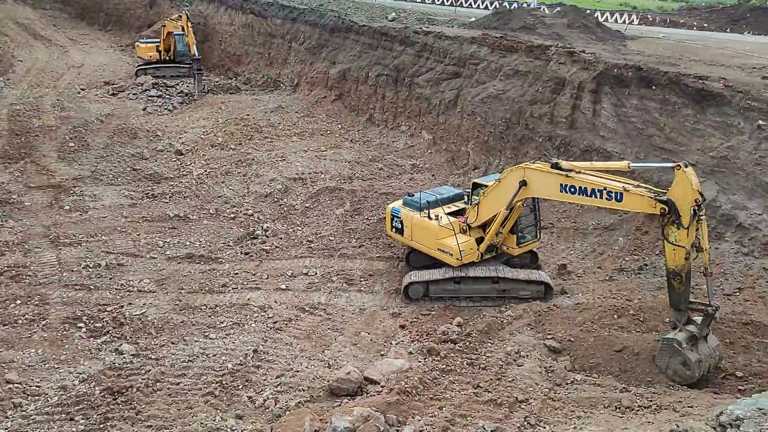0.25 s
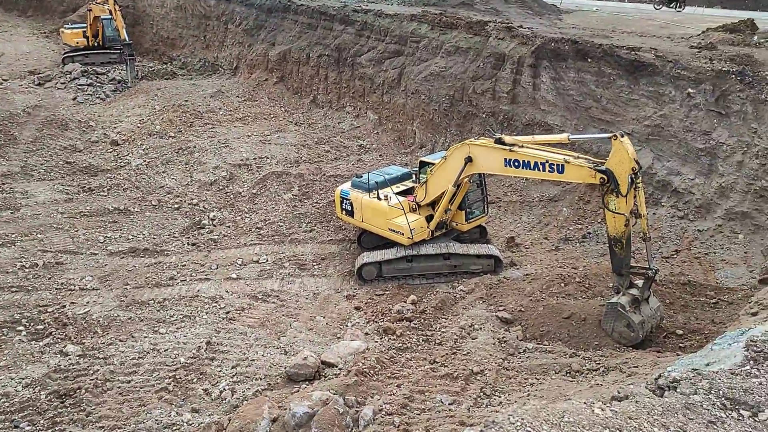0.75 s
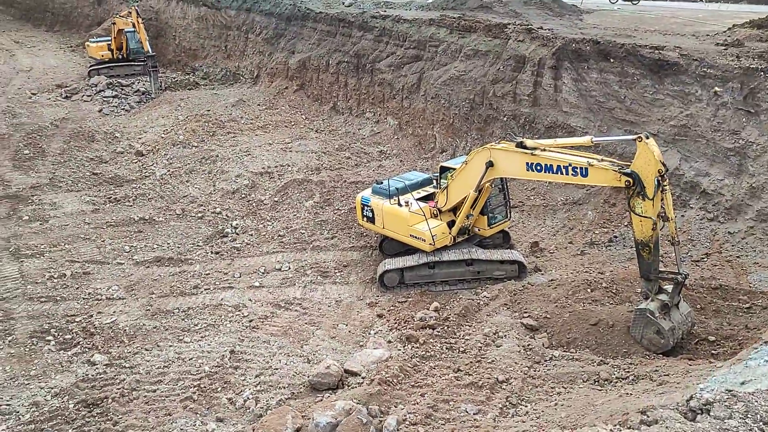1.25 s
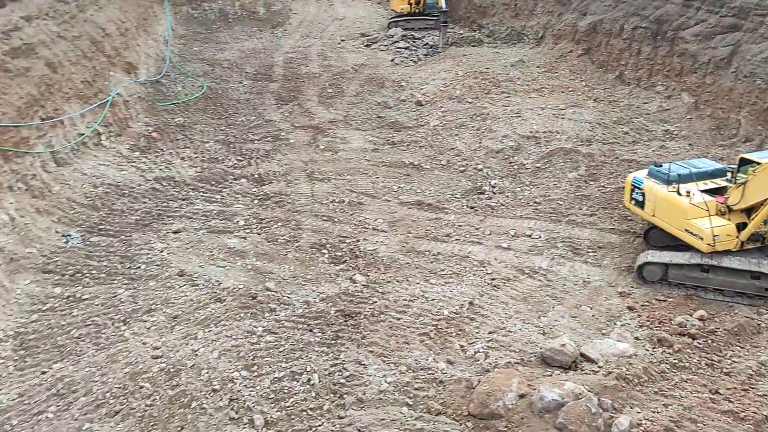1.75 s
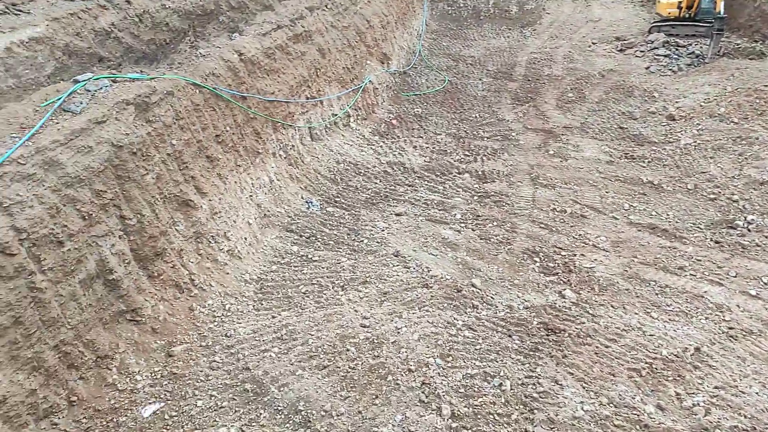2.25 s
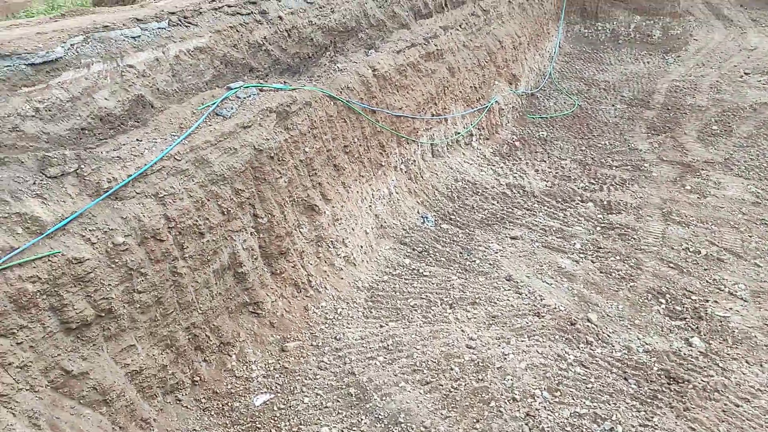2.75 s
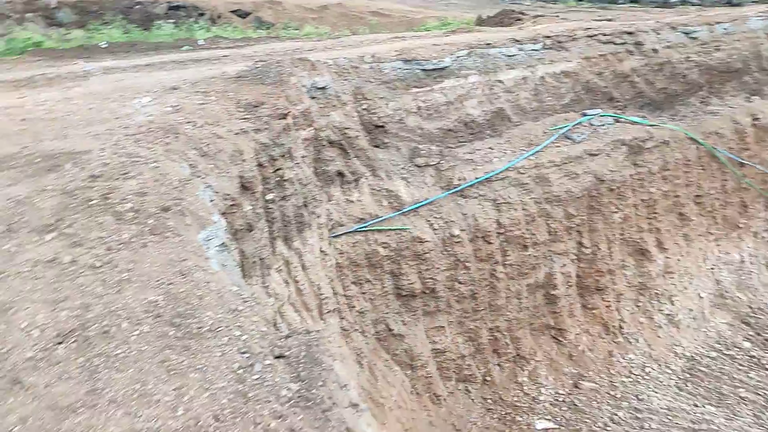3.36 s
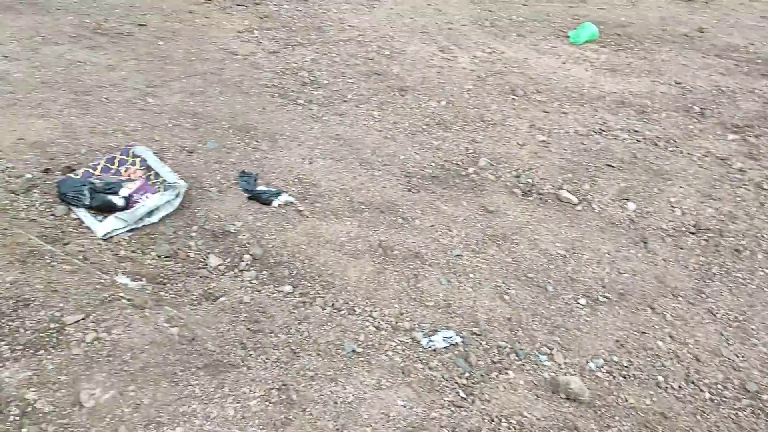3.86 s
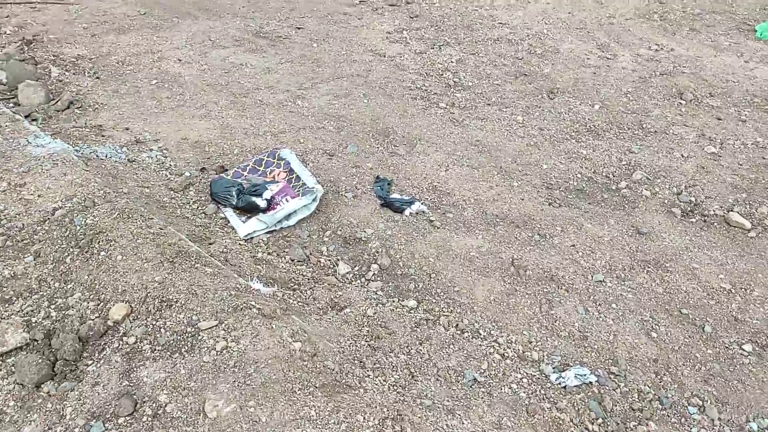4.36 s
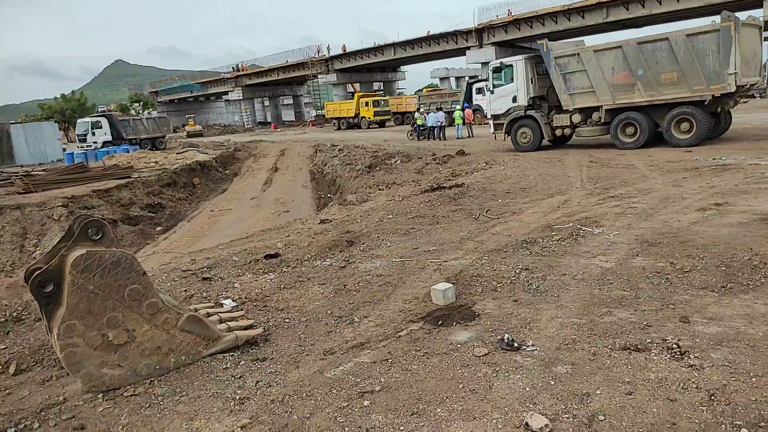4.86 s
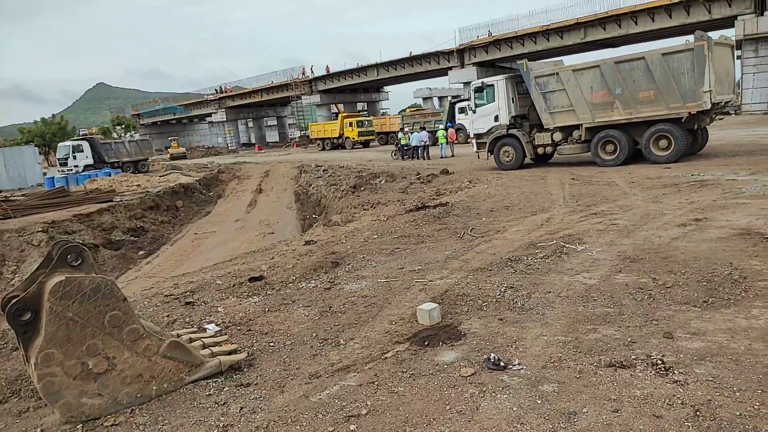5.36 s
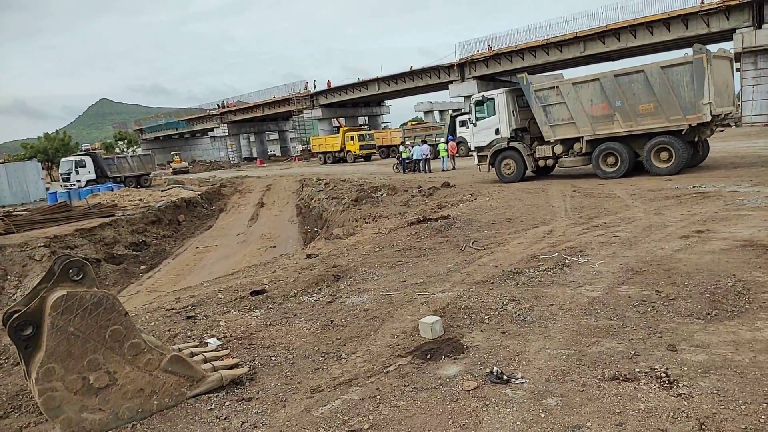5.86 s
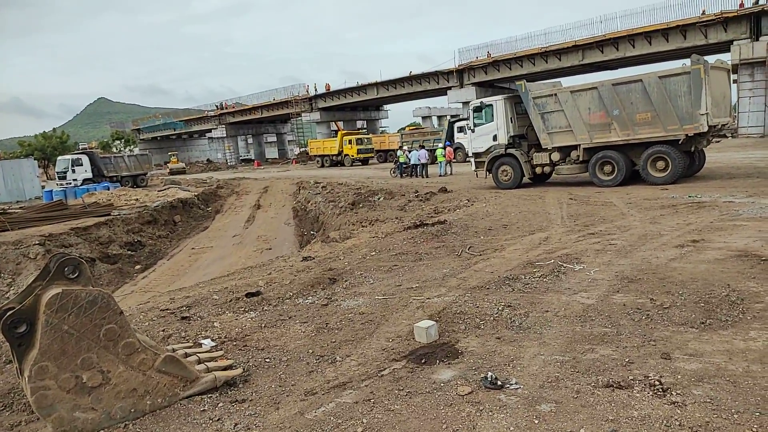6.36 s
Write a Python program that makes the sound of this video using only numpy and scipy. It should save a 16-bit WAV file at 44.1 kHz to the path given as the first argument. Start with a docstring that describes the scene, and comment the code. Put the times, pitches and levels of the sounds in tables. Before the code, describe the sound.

In an open earth pit a hydraulic breaker pounds rock in rapid even blows, about five a second, each a hollow boom, steel clang, dull thud and gritty crack with an echo off the pit wall. Diesel engines run steadily behind. As the handheld stereo microphone turns away, wind bursts thump and crackle on it; a faint squeal of metal passes. Then the hammering is quieter from beside the haul road, still with gusts.

```python
"""A hydraulic breaker pounds rock about five times a second in an earth pit: each blow rings housing and
chisel, thuds in the rock and cracks off splinters, built from dying tones and shaped noise, with hiss.
Diesel engines run steadily around the site, as wavering tones, clatter and throbbing noise.
The listener turns away, then stands by the haul road; noise gusts buffet the two microphone ports.
A faint metal squeal, two rushes of hiss and a few dry ticks are heard besides."""
import sys
import numpy as np
from scipy import signal
from scipy.fft import rfft, irfft, next_fast_len
from scipy.io import wavfile
from scipy.ndimage import uniform_filter1d

SR = 44100
rng = np.random.default_rng(int(sys.argv[2]) if len(sys.argv) > 2 else 0)


def waveform_to_disk(signal):
    """Save audio, clipped to [-1, 1], as 16-bit WAV at the path in sys.argv[1]."""
    frames = np.transpose(np.atleast_2d(signal))
    scaled = np.clip(frames, -1, 1) * 32767
    samples = np.round(scaled).astype(np.int16)
    wavfile.write(sys.argv[1], SR, samples)


N = 291496
TIME = np.arange(N) / SR
FULL_LEFT_LAG_S = 0.00046   # how much later the left port hears a blow when the breaker is at full left


def from_db(db):
    """Turn decibels into a plain gain."""
    return 10 ** (np.asarray(db) / 20)


def rms_one(x):
    """Scale a sound to an average (rms) strength of 1."""
    return x / np.sqrt(np.mean(x ** 2) + 1e-20)


def read(rows, at):
    """Every column of a curve at the given times."""
    s, *columns = np.transpose(rows)
    return [np.interp(at, s, column) for column in columns]


def pan(db):
    """Left and right gains for a level difference; positive is louder on the left."""
    sides_db = np.array([np.atleast_1d(db), -np.atleast_1d(db)]) / 2
    return rms_one(np.ones(2))[:, None] * from_db(sides_db)


def nearer_port(db):
    """Left and right gains that leave the louder port at full level."""
    return pan(db) / pan(db).max()


def add(out, s, sound):
    """Mix a stereo sound in at a time."""
    at = max(round(s * SR), 0)
    part = sound[:, :max(N - at, 0)]
    out[:, at:at + part.shape[1]] += part


def colour(x, spectrum):
    """Filter by a curve of (frequency [Hz], level [dB])."""
    length = x.shape[-1]
    size = next_fast_len(length)
    hz, db = np.transpose(spectrum)
    bins = np.maximum(np.fft.rfftfreq(size, 1 / SR), 1)
    gain = from_db(np.interp(np.log(bins), np.log(hz), db))
    return irfft(rfft(x, size) * gain, size)[..., :length]


def noise(spectrum, shape):
    """Random hiss with a given colour, rms 1."""
    return rms_one(colour(rng.standard_normal(shape), spectrum))


def butter(x, hz, kind, order):
    """Keep the sound below, above or between the given frequencies."""
    sos = signal.butter(order, np.clip(hz, 10, 0.45 * SR), kind, fs=SR, output="sos")
    return signal.sosfilt(sos, x)


def band_noise(low_hz, high_hz):
    """Separate noise for the two ports between two frequencies."""
    return butter(rng.standard_normal((2, N)), [low_hz, high_hz], "band", order=2)


def drift(rate):
    """Slow chance wandering of spread 1, quicker for a higher rate; worked out every 40 samples."""
    r = np.exp(-80 * np.pi * rate / SR)
    slow = signal.lfilter([1], [1, -2 * r, r * r], rng.standard_normal(N // 40 + 2002))[2000:]
    return np.interp(np.arange(N) / 40, np.arange(len(slow)), rms_one(slow))


def decay(t, t60):
    """Silent before zero, then dying away by 60 dB in t60 seconds."""
    return (t >= 0) * np.exp(-np.log(1000) * np.maximum(t, 0) / t60)


def engines(site_db=-28.0, throb=0.023, wander=0.00402, clatter_db=-49, clatter_spread_db=4):
    """A near diesel's wavering firing tones and clatter over the throbbing wash of other machines."""
    firing_hz = 52.7   # average firing rate
    # tones of the engine and its pumps: (multiple of the firing rate [ratio], level [dB])
    orders = [(1, -38), (1.999, -43.5), (3, -40), (3.9, -43.5), (5, -48)]
    # colour of the machines across the site: (frequency [Hz], level [dB per Hz])
    site = [(20, 5), (60, 1.5), (115, -7.5), (175, -1.5), (300, -2), (430, -10.5), (560, -11.5),
            (850, -13.5), (1500, -21), (2600, -24.5), (4000, -30.5), (6000, -34.5), (9000, -31),
            (14000, -97)]
    # level of the engines as the listener turns: (time [s], level [dB], left-right [dB])
    engine_level = [(0, 1, 1), (1.6, 0, 0.5), (3.3, 0, -2), (3.8, -1.5, 0), (4.6, 0, 0.5), (5.7, -0.5, -1),
                    (6.6, -3, -3)]

    turns = np.cumsum(firing_hz * (1 + wander * drift(2.03))) / SR   # firings so far
    hum = 0
    for multiple, db in orders:
        level = from_db(db + 4 * drift(9)) * np.sqrt(2)
        phase = multiple * (turns + 0.05 * drift(9)) + rng.random()
        hum = hum + level * np.sin(2 * np.pi * phase)
    wash = noise(site, (2, N)) * (1 + throb * np.sin(2 * np.pi * turns)) * from_db(1.0 * drift(18))
    # the strength of the knocks wanders from firing to firing
    firings = decay(turns % 1 / firing_hz, 0.071) * from_db(clatter_spread_db * drift(30))
    clatter = rms_one(firings * band_noise(1000, 3200))
    level_db, side_db = read(engine_level, TIME)
    return pan(side_db) * from_db(level_db) * (hum + from_db(site_db) * wash) + from_db(clatter_db) * clatter


def squeal(squeal_db=-1.0):
    """Steel rubs on steel for a moment somewhere on the site: a few unsteady tones."""
    # faint rise and fall of the squeal: (time [s], level [dB])
    squeal_level = [(3.64, -70), (3.73, -48), (3.8, -46), (3.98, -47), (4.12, -52), (4.28, -72)]
    # its middle pitch: (time [s], frequency [Hz])
    squeal_pitch = [(3.78, 2910), (3.88, 3200), (3.98, 3300), (4.2, 3200)]
    # its tones: (multiple of that pitch [ratio], level [dB])
    squeal_tones = [(1, 0), (.95, -4), (1.025, -4)]

    (level_db,), (hz,) = read(squeal_level, TIME), read(squeal_pitch, TIME)
    tones = 0
    for ratio, db in squeal_tones:
        cycles = np.cumsum(ratio * hz * (1 + 0.022 * drift(140))) / SR
        tones = tones + from_db(db + 4 * drift(19)) * np.sin(2 * np.pi * cycles)
    rubbing = (TIME > squeal_level[0][0]) & (TIME < squeal_level[-1][0])
    return pan(3) * rubbing * from_db(level_db + squeal_db) * rms_one(tones)


def rushes():
    """Soft rushes of hiss: bands of noise that swell to a peak and die away."""
    # (time of peak [s], rise [s], t60 [s], level [dB], pitch that places the band [Hz])
    rush_list = [(2.3, 0.046, 0.5, -29.5, 5400), (3.779, 0.014, 1.8, -39, 3840)]
    out = np.zeros((2, N))
    for s, rise, t60, db, hz in rush_list:
        shape = decay(TIME - s, t60) + (TIME < s) * np.exp(-abs(TIME - s) / rise)
        out += from_db(db) * shape * rms_one(band_noise(hz / 3.3, hz * 1.8))
    return out


def ticks():
    """A few small, sharp, dry ticks: very short bursts of high noise."""
    # (time [s], strength before the common cut [dB], left-right [dB])
    tick_list = [(0.134, -17, 8), (5.774, -24, 2), (6.229, -7, 8), (6.236, -6, -2), (6.266, -12, 26)]
    out, t = np.zeros((2, N)), TIME[:SR // 20]
    for s, db, side_db in tick_list:
        burst = decay(t, 0.0086) * butter(rng.standard_normal(len(t)), 5900, "high", order=2)
        add(out, s, pan(side_db) * from_db(db - 18.5) * burst)
    return out


def buffet(eddies, top_hz):
    """Eddies on a port, heard up to about the pitch of the smallest; rms 1."""
    band = butter(butter(eddies, top_hz * 1.225, "low", order=4), top_hz * 0.22, "low", order=1)
    return rms_one(butter(band, 166.4, "high", order=3))


def wind_eddies(lumps_db=3.5, surge_db=1.5, knocks_per_s=70, knock_size=10):
    """Lumpy noise with scattered knocks, one set for the breeze and one for the gusts, two ports each."""
    shape = (2, 2, N)
    knocks = knock_size * (rng.random(shape) < knocks_per_s / SR) * rng.choice([-1, 1], shape)
    lumps = from_db(np.array([lumps_db * drift(138) + surge_db * drift(35) for port in range(2)]))
    return knocks + rng.standard_normal(shape) * lumps


def breeze(eddies, rumble, rumble_db=0.0, flutter_hz=320, flutter_db=-3, flutter_pan_db=3):
    """The breeze rumbles and flutters at each port."""
    # strength and side of the breeze: (time [s], level [dB], left-right [dB])
    breeze_level = [(0, -44, 7), (1.8, -34, 2), (1.92, -18, -4), (2.2, -24, 1), (2.39, -32, -2),
                    (2.6, -28, 7), (3.05, -30.5, -4), (3.5, -22.5, -4), (3.8, -27, 17), (4.1, -24.5, -1),
                    (4.4, -37, -5), (4.72, -40, 13), (4.9, -30.5, 10.5), (5.45, -28, 9), (5.65, -26, 7),
                    (5.9, -27.5, 3.5), (6.2, -24, 6.5), (6.6, -26.5, -2.5)]
    level_db, side_db = read(breeze_level, TIME)
    flutter = pan(flutter_pan_db) * from_db(flutter_db) * buffet(eddies, flutter_hz)
    return pan(side_db) * from_db(level_db) * (from_db(rumble_db) * rumble + flutter)


def gusts(eddies, rumble, fade_db=3, rise_s=0.0048, fall_s=0.032, slap_db=-4.0, slap_t60=0.02,
          weight_db=-12):
    """Short lumpy gusts start softened, fade along their length and deepen the rumble."""
    # (start [s], length [s], pitch of the smallest eddy [Hz], level [dB], left-right [dB])
    gust_list = [(1.623, 0.15, 314, -26, -11), (1.858, 0.079, 550, -13, -25), (1.97, 0.07, 760, -16, 3.5),
                 (2.089, 0.057, 890, -15.5, 3), (2.17, 0.078, 685, -13.5, 9), (2.241, 0.11, 880, -19.5, 22),
                 (2.488, 0.041, 486, -16.5, 7), (2.559, 0.072, 990, -16.5, 39),
                 (2.725, 0.094, 274, -22.5, 12), (2.892, 0.099, 1080, -13, 29), (3.386, 0.19, 236, -17, 3),
                 (3.434, 0.058, 655, -12.5, 12), (3.536, 0.14, 418, -19.5, 19), (3.625, 0.13, 556, -20, 22),
                 (4.174, 0.02, 550, -12, -20), (4.823, 0.19, 355, -17, 24), (5.091, 0.3, 307, -18, 14),
                 (5.406, 0.071, 527, -12, 17), (5.455, 0.097, 570, -19.5, 26), (6.254, 0.23, 580, -14, 23),
                 (6.494, 0.29, 870, -16.5, 17)]
    out = np.zeros((2, N))
    for start, length, top_hz, db, side_db in gust_list:
        span = slice(max(int((start - rise_s) * SR), 0), int((start + length + fall_s) * SR))
        t = TIME[span] - start
        edges = np.clip(np.minimum(t / rise_s, (length - t) / fall_s) + 0.5, 0, 1)
        shape = edges * from_db(fade_db * (1 - t / length) + slap_db * decay(t, slap_t60))
        flutter = np.array([buffet(port, top_hz) for port in eddies[:, span]])
        gust = flutter + from_db(weight_db) * rumble[:, span]
        out[:, span] += nearer_port(side_db) * from_db(db) * shape * gust   # windward port is loudest
    return out


def wind():
    """Breeze and gusts share one low rumble, made separately for each port."""
    low = butter(rng.standard_normal((2, N)), 130, "low", order=2)
    rumble = rms_one(butter(low, 23.0, "high", order=2))
    eddies = wind_eddies()
    return breeze(eddies[0], rumble) + gusts(eddies[1], rumble)


def thumps(thump_db=1, wake_db=-23, wake_t60=0.07):
    """One eddy hits a port: a sharp pressure pulse with a short churning wake."""
    # (time [s], pitch of the smallest eddy [Hz], peak before thump_db [dB], left-right [dB])
    thump_list = [(1.634, 330, -16, -18), (1.821, 553, -10, -18), (1.922, 890, -7.5, -17),
                  (1.968, 920, -2, 19), (2.049, 420, -8, -11), (2.166, 880, -3, 11), (2.198, 450, -22, 12),
                  (2.238, 1100, -2, 19), (2.577, 1310, -1, 22), (2.603, 1480, -4.5, 18),
                  (2.901, 1310, -20, 17), (2.961, 1120, -10, 24), (3.413, 604, -5.5, 13),
                  (3.488, 280, -5, -8), (3.508, 895, -11, 2), (3.529, 250, -6, -16), (4.863, 380, -8, 20),
                  (4.905, 634, -11, 14), (4.966, 360, -5, 3), (5.084, 1100, -13.5, 16),
                  (5.274, 310, -5.5, -6), (5.351, 710, -5.5, 23), (5.463, 785, -7, 25),
                  (5.726, 415, -9.5, 17), (6.265, 775, -9, 24), (6.310, 696, -7, 25),
                  (6.457, 895, -6.5, 12), (6.5, 850, -12, 16)]
    out, t = np.zeros((2, N)), TIME[:SR // 16]
    for s, top_hz, db, side_db in thump_list:
        wake = from_db(wake_db) * rng.standard_normal((2, len(t))) * decay(t, wake_t60)
        pulse = buffet((t == 0) + wake, top_hz)
        pulse = pulse / abs(pulse).max(axis=1)[:, None]
        add(out, s, nearer_port(side_db) * from_db(db + thump_db) * pulse)
    return out


def crackle(x, crackle_db=-19, low_hz=800, high_hz=1900):
    """The strongest swings of the wind tear at the port's edge and crackle."""
    return from_db(crackle_db) * x * abs(x) * rms_one(band_noise(low_hz, high_hz))


def leftward(at):
    """How far to the left the breaker lies, from -1 to 1."""
    # direction of the breaker as the listener turns: (time [s], angle to the left [degrees])
    bearing = [(.1, 40), (.9, 53), (1.5, 48), (2.06, -14), (2.85, -36), (3.65, -78), (4.7, -70), (4.74, 57)]
    return np.sin(np.radians(read(bearing, at)[0]))


def blows(spread_db=0.77):
    """Each blow's time, strength with chance spread, direction (1 = full left) and listener's stance."""
    # runs of evenly spaced blows: (first blow [s], last blow [s], blows [count])
    runs = [(.113, 2.642, 14), (2.843, 4.647, 10), (4.784, 6.55, 10)]
    # strength of the blows at the listener: (time [s], level [dB])
    strength = [(.1, -1), (.7, -1.5), (1.5, -2), (2.06, -2), (2.6, 2.5), (3.3, 1), (3.95, -4), (4.65, -6),
                (4.8, -10), (5.3, -7.5), (5.8, -9), (6.55, -9)]
    # the listener faces the pit, turns aside, turns right away, then stands by the haul road:
    # (from [s], boom [dB], plate [dB], rock [dB], chisel [dB], crack [dB], pit-wall echo [dB],
    #  bass left-right [dB], boom pitch [ratio], left port's lag for the boom [s], clank [Hz],
    #  clank [dB], crack common to both ports [0-1], echo delay [s], t60 of thud and crack [s],
    #  thud left-right [dB], treble of the crack [dB])
    stances = [(0, -15.5, -37, -20.5, -19.5, -32.5, -2.5, 7, 1.02, 0.00049, 1136, -17.5, 0.08, 0.024, 0.3, 4, -0.5),
               (1.95, -25.5, -26, -22.5, -27, -35.5, 0, -0.5, 1.05, -.0003, 1260, -29.5, 0.4, 0.024, 0.3, 1.5, -4),
               (3.4, -30, -20.5, -21, -23.5, -36, -1, 1, .99, -.0004, 1450, -24.5, 0.44, 0.023, 0.26, 3, -1),
               (4.72, -10.5, -24, -20.5, -20, -30.5, 3, 7.5, .99, .0004, 2410, -25.5, 1, 0.028, 0.33, -9, 1)]
    names = ("boom_db plate_db rock_db chisel_db crack_db echo_db bass_pan_db pitch boom_lag_s clank_hz "
             "clank_db alike echo_s t60 rock_pan_db treble_db").split()

    for first, last, count in runs:
        for s in np.linspace(first, last, int(count)):
            stance = [row[1:] for row in stances if row[0] <= s][-1]
            blow_db = read(strength, s)[0] + spread_db * rng.normal()
            yield s, blow_db, leftward(s), dict(zip(names, stance))


def pit(t, stance, t60, tail_db, tail_t60):
    """Envelope of a blow in the pit: direct sound, the far wall's echo and a scattered tail."""
    echo = from_db(stance["echo_db"])
    direct_power = decay(t, t60) ** 2
    echo_power = (echo * decay(t - stance["echo_s"], t60)) ** 2
    tail_power = (from_db(tail_db) * decay(t, tail_t60)) ** 2
    return np.sqrt((direct_power + echo_power + tail_power) / (1 + echo ** 2))


def scatter(x, paths, s, gain=1.0):
    """Echoes off nearby ground and steel; their delays shift slowly as the listener moves."""
    out = x.copy()
    for k, (delay_s, slide) in enumerate(paths):
        lag = max(int(delay_s * (1 + slide * s) * SR), 1)
        out[:, lag:] += (-1) ** k * gain * x[:, :-lag]
    return out / np.sqrt(1 + len(paths) * gain ** 2)


def at_ports(spectrum, lag_s, size, alike):
    """Noise that both ports partly share; a positive lag makes the left one hear it later."""
    three, at = noise(spectrum, (3, size)), np.arange(size)
    alike = np.clip(alike, 0, 1)
    shared = np.array([np.interp(at - np.round(lag_s * SR), at, three[0]), three[0]])
    return np.sqrt(alike) * shared + np.sqrt(1 - alike) * three[1:]


def blow_hiss(swell_s=0.018, swell_db=-6, hiss_db=1.0):
    """A hiss swells ahead of each blow and dies after it."""
    # colour of the hiss: (frequency [Hz], level [dB per Hz])
    hiss_colour = [(2500, -13), (4500, -0.5), (6000, -1), (8000, 3.5), (14000, -5.5)]
    # level of the hiss that goes with the blows, before hiss_db: (time [s], level [dB])
    hiss_level = [(.1, -30), (.5, -29.5), (.7, -26.5), (1.1, -30), (1.5, -32.5), (2.06, -38), (2.3, -31),
                  (2.65, -29), (3.25, -33), (3.45, -39.5), (3.85, -46), (4.45, -46), (4.65, -40),
                  (4.79, -31.5), (4.98, -31), (5.18, -28), (5.57, -28.5), (5.77, -31), (5.96, -29.5),
                  (6.36, -30.5), (6.55, -28.5)]

    power, around = np.zeros((2, N)), TIME[:SR // 2] - 0.1   # starts 0.1 s before the blow
    for s, _, left, stance in blows():
        swell = from_db(swell_db) * (around < 0) * np.exp(-abs(around) / swell_s)
        shape = pit(around, stance, t60=0.21, tail_db=-14.0, tail_t60=0.36) + swell
        side_db = 1 - 6.5 * left   # left-right balance follows the breaker's direction
        level = from_db(read(hiss_level, s)[0] + hiss_db)
        add(power, s + around[0], (pan(side_db) * level * shape) ** 2)
    hiss = at_ports(hiss_colour, FULL_LEFT_LAG_S * leftward(TIME), N, alike=0.076)
    return np.sqrt(power) * hiss * from_db(1.3 * drift(64))


def ring(modes, t, attack_s=0.0038):
    """Struck modes of alternating sign: a close pair swells before it fades."""
    tones = 0
    for k, (hz, db, t60) in enumerate(modes):
        tones = tones + (-1) ** k * from_db(db) * np.sin(2 * np.pi * hz * t) * decay(t, t60)
    return (1 - np.exp(-np.maximum(t, 0) / attack_s)) * tones


def housing_boom(t, stance, boom_db=9.0, swell_s=0.0074):
    """The breaker's housing and its side plate boom, with slight chance shifts of pitch and level."""
    # modes of the housing, the main two close together: (frequency [Hz], level [dB], t60 [s])
    housing = [(160.7, -12, 0.18), (243, -14.5, 0.14), (279.4, -12, 0.16), (346, 0.5, 0.14),
               (355.9, -2, 0.14), (428.5, -14.5, 0.14)]
    # modes of the side plate, heard best from one side: (frequency [Hz], level [dB], t60 [s])
    plate = [(415.7, 5, 0.24), (263, 0, 0.15)]
    t_boom = t - np.array([[stance["boom_lag_s"]], [0]])
    pitch = stance["pitch"] * (1 + 0.008 * rng.normal())
    struck = [(hz * pitch * (1 + 0.003 * rng.normal()), db + 1.2 * rng.normal(), t60)
              for hz, db, t60 in housing]
    boom = from_db(stance["boom_db"] + boom_db) * ring(struck, t_boom, swell_s)
    return pan(stance["bass_pan_db"]) * (boom + from_db(stance["plate_db"]) * ring(plate, t_boom, swell_s))


def chisel_clang(t_ports, stance, detune=0.0031, strike_spread_db=1.8):
    """The steel chisel rings in many modes, each with its own side and a fresh strength every blow."""
    # modes of the chisel: (frequency [Hz], level [dB], t60 [s], left-right [dB])
    chisel = [(677.5, -12.5, 0.28, -12), (808, -6.5, 0.33, -4), (862, -16, 0.24, 5), (959, -6.5, 0.31, -1),
              (1096, -5.5, 0.43, 2.5), (1234, -9, 0.11, -8), (1352, -8, 0.045, 14), (1537, -13, .16, 4),
              (1660, -12, 0.14, 1), (1924, -10, 0.17, 0), (2310, -22, 0.13, 10), (2510, -16.5, 0.15, -3),
              (2700, -18.5, 0.19, 11)]
    clang = 0
    for k, (hz, db, t60, side_db) in enumerate(chisel):
        mode = (hz * (1 + detune * rng.normal()), db + strike_spread_db * rng.normal(), t60)
        clang = clang + (-1) ** k * pan(side_db) * ring([mode], t_ports)
    return from_db(stance["chisel_db"]) * clang


def steel_clank(t, t_ports, stance, steel, dying, clank_t60=0.01, tail_db=-4):
    """The same noise for every blow, filtered to a hump at the stance's clank pitch, dies quickly."""
    hz = stance["clank_hz"]
    hump = [(hz / 2.2, -28), (hz / 1.09, 0), (hz * 1.08, 0), (hz * 1.25, -10), (hz * 1.96, -15),
            (hz * 3.0, -40)]   # (frequency [Hz], level [dB])
    sound = np.interp(t_ports, t, rms_one(colour(steel, hump)))
    return from_db(stance["clank_db"]) * sound * (decay(t, clank_t60) + from_db(tail_db) * dying)


def stone_crack(t, stance, paths, s, lag_s, dying, crack_db=6.0, snap_db=-12, snap_t60=0.0093):
    """The stone cracks with new noise at every blow, scattered by ground and steel."""
    # colour of the crack: (frequency [Hz], level [dB per Hz])
    crack_colour = [(700, -47), (1400, 4.5), (1850, 0.5), (2200, -8.5), (2550, -0.5), (3100, -4),
                    (3800, -3), (4400, -4), (5200, -21.5), (8000, -6), (14000, -50)]
    stone = [(hz, db + stance["treble_db"] * (hz > 3400)) for hz, db in crack_colour]
    sound = scatter(at_ports(stone, lag_s, len(t), stance["alike"]), paths, s)
    shape = dying + from_db(snap_db) * decay(t, snap_t60)
    return from_db(stance["crack_db"] + crack_db) * sound * shape


def splinters(t, paths, s, lag_s, count=48, low_hz=1000, high_hz=4800, cycles=15, size_db=5.0, t60=0.28):
    """A dense spray of splinters snaps off at each blow, each ringing briefly at a pitch of its own."""
    t = t[:SR // 11]
    hz = low_hz * (high_hz / low_hz) ** rng.random((count, 1))
    born = 0.07 * rng.random((count, 1)) ** 1.5   # seconds after the blow, mostly early
    size = from_db(size_db * rng.normal(size=(count, 1))) * decay(born, t60) * np.sqrt(low_hz / hz)
    rings = np.sin(2 * np.pi * hz * (t - born)) * decay(t - born, cycles / hz)
    spray = np.sum(size * rings, axis=0)
    return scatter(np.array([np.interp(t - lag_s, t, spray), spray]), paths, s, gain=0.37)


def breaker(rock_db=1, grit_db=2.0, splinters_db=7.5):
    """Blows nearly repeat boom, thud and steel clank; the stone's crack and splinters are always new."""
    # colour of the thud in the rock: (frequency [Hz], level [dB per Hz])
    rock_colour = [(110, 3), (170, 12.5), (300, 2), (440, 10), (560, -9), (780, 1), (1100, -2),
                   (1400, -9.5), (2000, -19), (3000, -27.5)]
    out, t = np.zeros((2, N)), TIME[:SR // 2]
    thud = noise(rock_colour, (2, len(t)))   # the same paths through the pit for every blow
    steel = rng.standard_normal(len(t))
    paths = rng.uniform([0.0005, -0.03], [0.008, 0.03], (7, 2))   # (delay [s], change [share per s])
    grit = from_db(grit_db * drift(130))   # stone crumbles unevenly
    for s, blow_db, left, stance in blows():
        lag_s = FULL_LEFT_LAG_S * left
        t_ports = t - np.array([[lag_s], [0]])
        boom = housing_boom(t, stance)
        clang = chisel_clang(t_ports, stance)
        fresh_thud = thud + 0.24 * noise(rock_colour, thud.shape)
        rock = fresh_thud * pit(t, stance, stance["t60"], tail_db=-3, tail_t60=0.83)
        rock = pan(stance["rock_pan_db"]) * from_db(stance["rock_db"] + rock_db) * rock
        dying = pit(t, stance, stance["t60"], tail_db=-3.0, tail_t60=0.3)
        clank = steel_clank(t, t_ports, stance, steel, dying)
        crack = stone_crack(t, stance, paths, s, lag_s, dying)
        rattle = (clank + crack) * np.roll(grit, -round(s * SR))[:len(t)]
        add(out, s, from_db(blow_db) * (boom + rock + clang + rattle))
        spray_db = blow_db + stance["crack_db"] + splinters_db
        add(out, s, from_db(spray_db) * splinters(t, paths, s, lag_s))
    return out


def scene():
    """The site, the wind at the ports and the breaker together."""
    air = wind() + thumps()
    background = engines() + squeal() + rushes() + ticks()
    return background + air + crackle(air) + blow_hiss() + breaker()


def record(dry, threshold_db=-17, squeeze=0.18, release_db_per_s=90):
    """The ports resonate in the treble, gain control ducks loud moments, peaks round off, the top is cut."""
    # colour of the left and right ports: (frequency [Hz], level [dB])
    left_port = [(4000, 1.5), (6000, 2.5), (7400, 2), (8500, 8.5), (9300, 5.5), (10000, -14),
                 (14000, -18.5)]
    right_port = [(4000, 0.5), (6000, 6), (7000, 6), (7750, 11.5), (8700, 3), (9800, -5.5), (14000, -17.5)]
    x = np.array([colour(dry[0], left_port), colour(dry[1], right_port)])
    power = uniform_filter1d(np.mean(x ** 2, axis=0), size=900)
    over_db = np.maximum(10 * np.log10(np.maximum(power, 1e-12)) - threshold_db, 0)
    # follows a rise at once and falls back at the release rate
    release_db = release_db_per_s * TIME
    held_db = np.maximum.accumulate(over_db + release_db) - release_db
    x = x * from_db(-squeeze * butter(held_db, 63, "low", order=1))
    return butter(np.tanh(x), 14800, "low", order=12)


dry = scene()
out = record(dry)
waveform_to_disk(out)
```